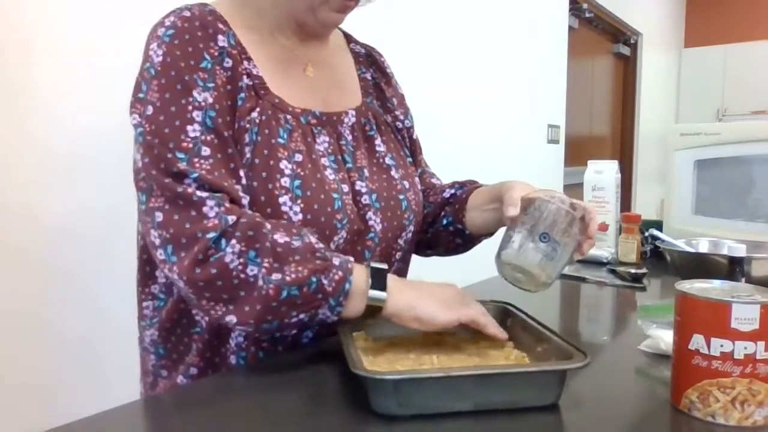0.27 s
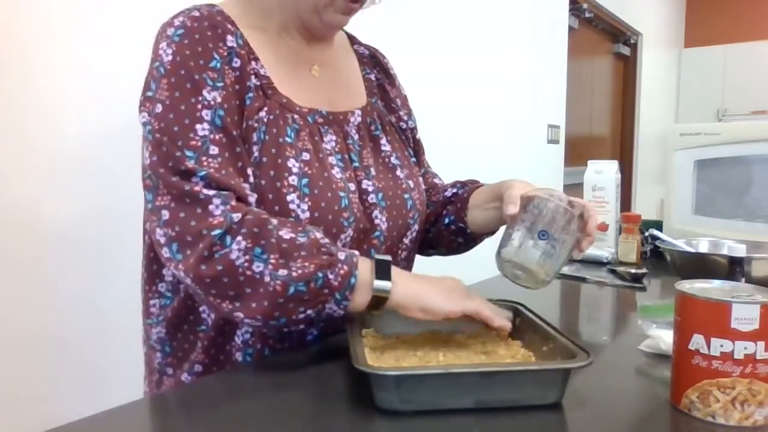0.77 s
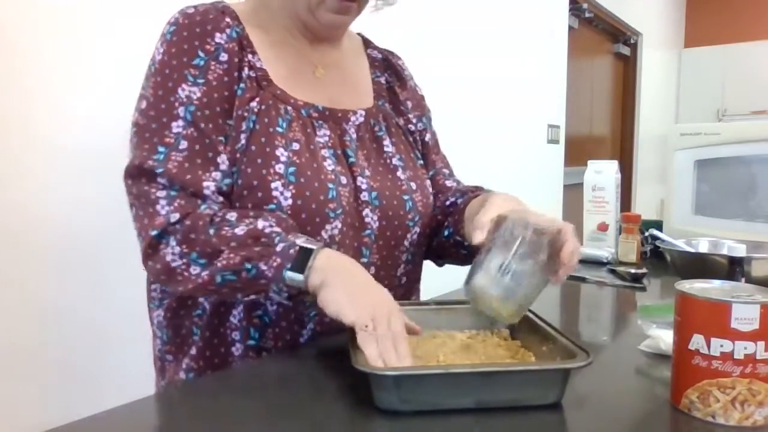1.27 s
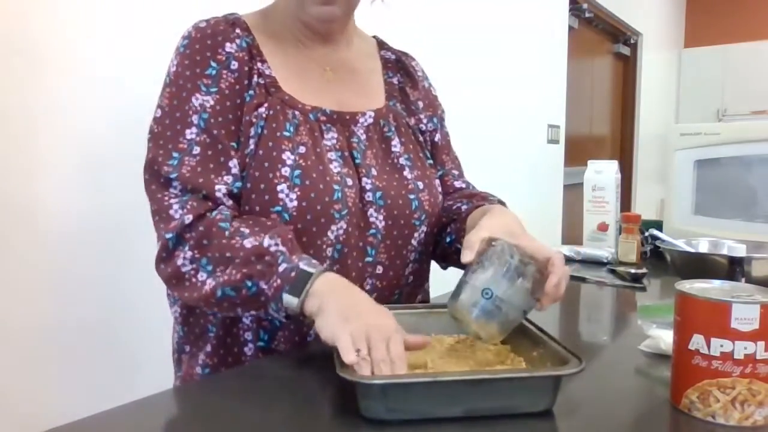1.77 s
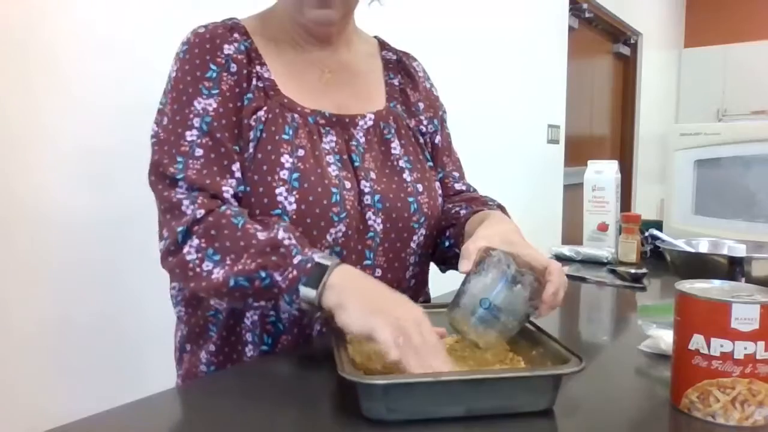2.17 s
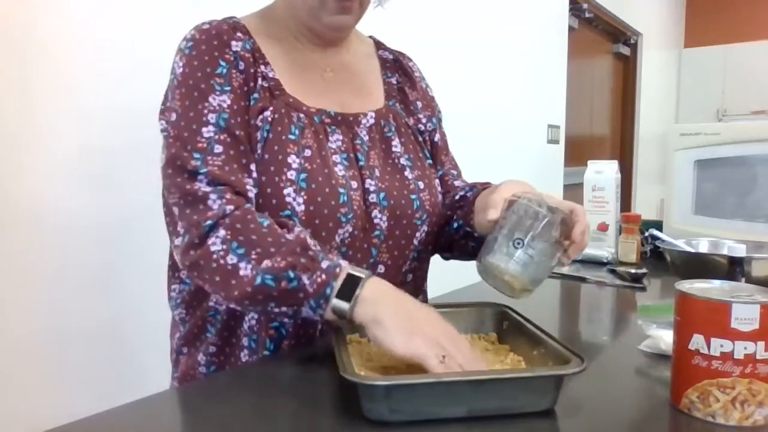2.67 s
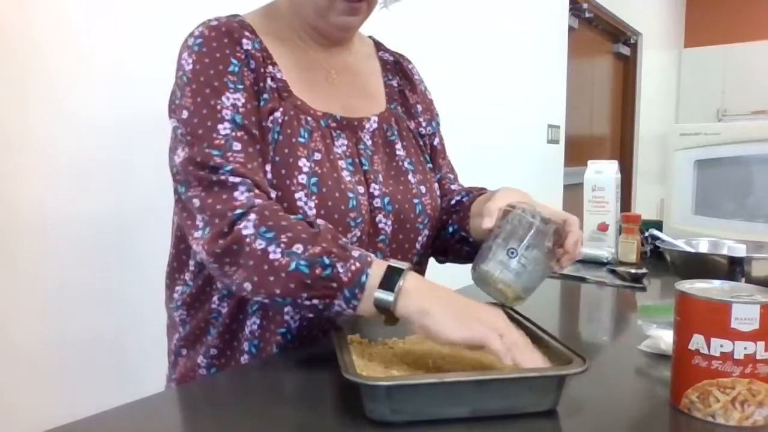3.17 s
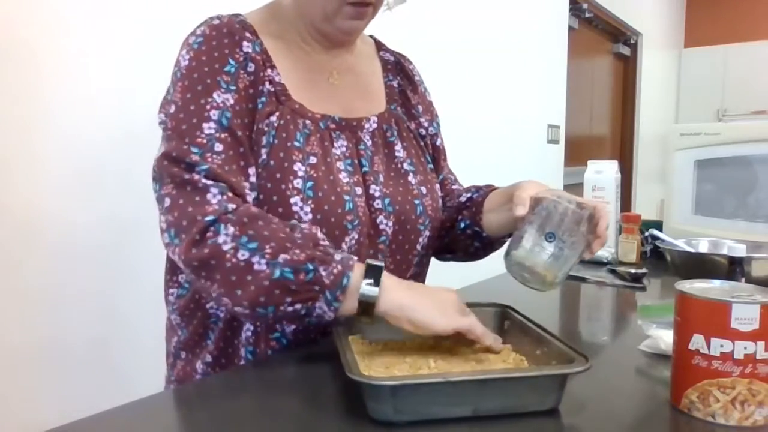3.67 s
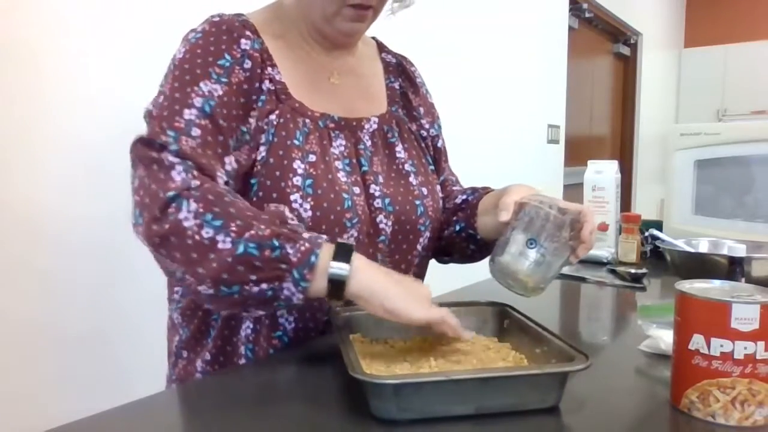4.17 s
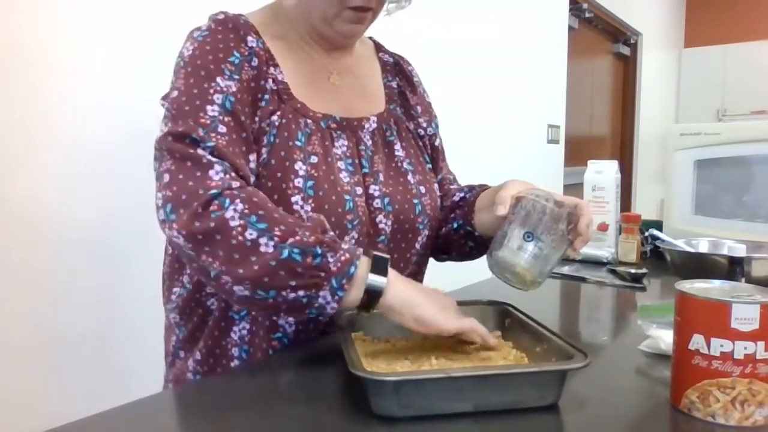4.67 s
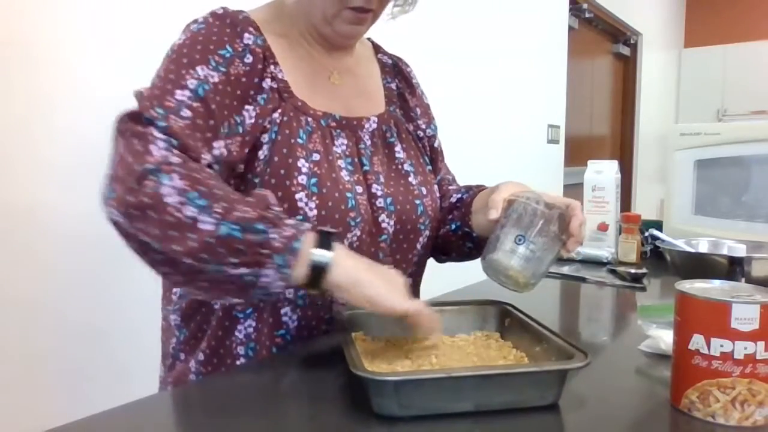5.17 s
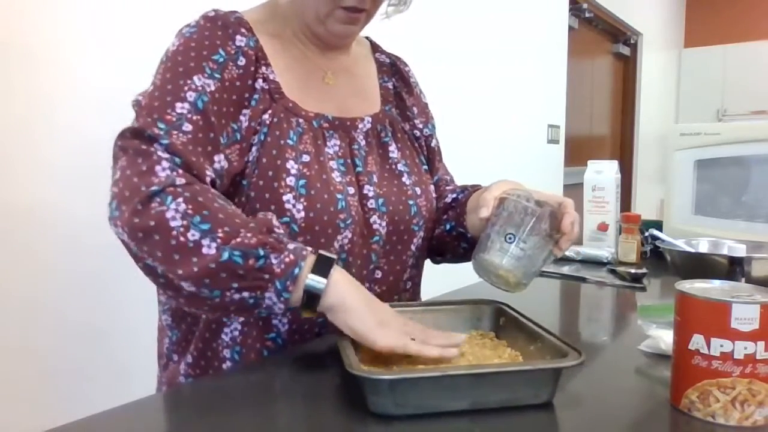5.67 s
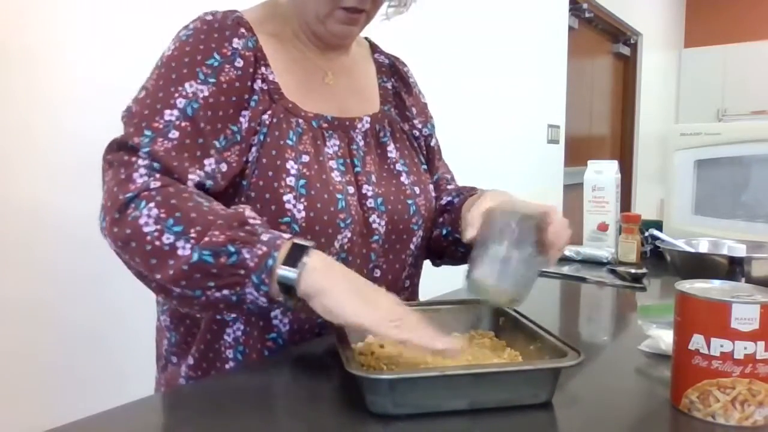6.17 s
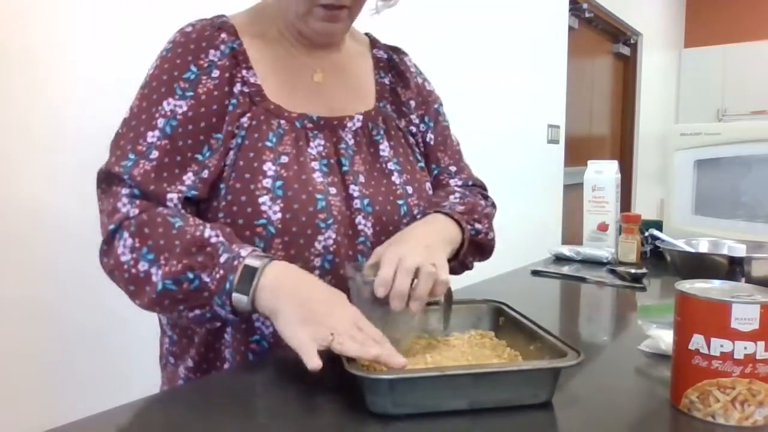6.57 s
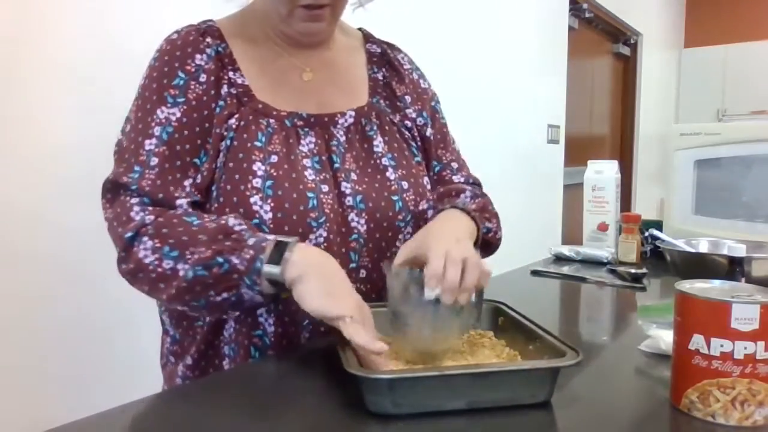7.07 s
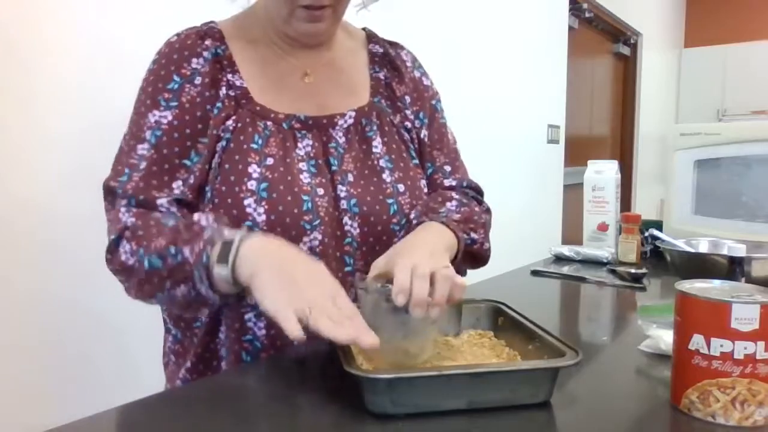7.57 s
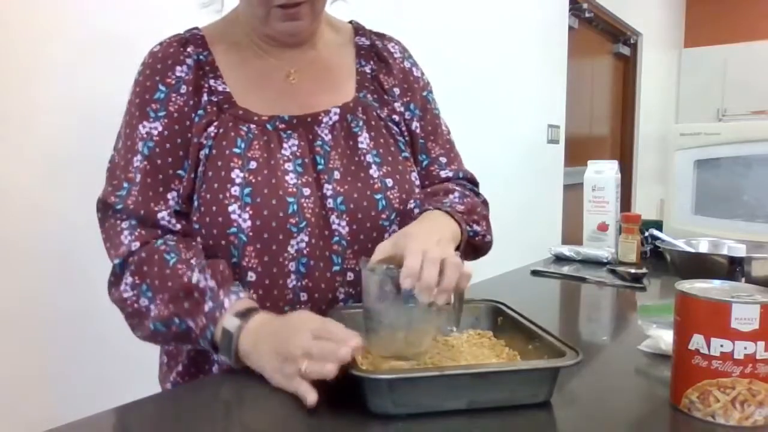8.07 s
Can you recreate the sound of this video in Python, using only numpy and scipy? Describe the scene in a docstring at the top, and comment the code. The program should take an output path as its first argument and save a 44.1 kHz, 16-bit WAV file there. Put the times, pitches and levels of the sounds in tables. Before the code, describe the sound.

Gritty rubbing and soft, hollow pats on a crumb crust, as a glass jar knocks a metal pan over faint room rumble.

```python
"""A kitchen counter, where a hand presses and smooths a crumb crust in a square metal baking pan.
Fingers brush in short, gritty strokes and pat hollow notes out of the crust; crumbs scrape and snap along
the pan's wall. A glass jar in the other hand comes down hard once among lighter knocks, ringing both
pan and glass. Near the end, fingertips tap the pan's side. The room rumbles faintly underneath."""
import sys
import numpy as np
from scipy import signal
from scipy.fft import rfft, irfft
from scipy.io import wavfile
from scipy.ndimage import uniform_filter1d

SR = 44100
rng = np.random.default_rng(int(sys.argv[2]) if len(sys.argv) > 2 else 0)


def to_wav(sig):
    """Store sig (one row per channel, or 1-D mono) as 16-bit WAV at the path in sys.argv[1].

    Samples outside -1..1 are clipped; the rate is SR.
    """
    pcm = np.clip(np.atleast_2d(sig), -1, 1) * 32767
    pcm = np.round(pcm).astype(np.int16)
    wavfile.write(sys.argv[1], SR, pcm.T)  # frames by channels


N = 366603
TIME = np.arange(N) / SR
HIT_TIME = TIME[:SR // 3]
FREQS = np.maximum(np.fft.rfftfreq(N, 1 / SR), 1)

# flat finger pats on the crust: (time [s], note [dB], final pitch [Hz], note t60 [s], crumb hiss [dB])
CRUST_PATS = [ (0.333, -42.5, 543, 0.14, -75), (3.707, -39, 523, 0.078, -49),
              (3.9646, -30, 529, 0.059, -46), (4.290, -40.5, 515, 0.1, -66),
              (4.671, -34.5, 523, 0.097, -37), (4.959, -32.5, 540, .07, -40.5),
              (5.294, -44, 766, 0.083, -66), (5.320, -45, 479, 0.18, -68), (6.54, -35, 509, 0.15, -51)]
# fingertip taps on the pan's side:
# (time [s], thud [dB], thud pitch [Hz], hiss fall [s], crumb hiss [dB], pressure [dB])
SIDE_TAPS = [ (7.174, -50, 1220, 0.011, -55, 8), (7.192, -25.5, 910, .005, -35, -5),
             (7.579, -42, 880, 0.017, -48.5, 1), (7.904, -45, 1080, .02, -45, 1.5),
             (8.278, -26, 960, 0.015, -42, 4.5)]


def from_db(db):
    """Decibels to gain."""
    return 10 ** (np.asarray(db) / 20)


def unit_rms(x):
    """Scale to unit power."""
    return x / np.sqrt(np.mean(x ** 2) + 1e-20)


def curve(points):
    """Draw a curve through (Hz, value) points over log frequency."""
    hz, value = np.transpose(points)
    return np.interp(np.log(FREQS), np.log(hz), value)


def mix_in(out, start, sound):
    """Mix a sound in at its start time, in seconds."""
    slot = out[..., round(start * SR):][..., :sound.shape[-1]]
    slot += sound[..., :slot.shape[-1]]


def wander(depth_db, samples):
    """A gain that drifts at random, smoothed over so many samples."""
    return from_db(depth_db * unit_rms(uniform_filter1d(rng.standard_normal(N), size=samples)))


def swells(rows, roundness):
    """Envelope from rows of (peak [s], rise [s], fall [s], level [dB]); 10 dB down at rise and fall."""
    t, power = TIME[::16], 0
    for peak, rise, fall, level_db in rows:
        away = np.abs(t - peak) / np.where(t < peak, rise, fall)
        power = power + from_db(level_db - 10 * away ** roundness) ** 2
    return np.interp(TIME, t, np.sqrt(power))


def stereo_noise(colour, grit_db=0):
    """Coloured noise with the pan's stereo image; grit makes some grains much larger than the rest."""
    # how alike left and right are: (frequency [Hz], likeness [0-1])
    likeness = [(500, .97), (1200, 0.7), (2500, 0.9), (5000, 0.3), (14000, 1)]
    # stereo balance: (frequency [Hz], left minus right [dB])
    balance = [(550, -0.5), (1650, -1), (5000, -0.5), (9000, -0.5), (13000, -7.5)]
    white = rng.standard_normal((2, N))
    grit = from_db(grit_db * rng.standard_normal(N // 16 + 1).repeat(16)[:N])
    mid, side = rfft(white * grit)
    alike = np.clip(curve(likeness), 0, .999)
    sides = np.array([[1], [-1]])
    pair = np.sqrt(1 + alike) * mid + sides * np.sqrt(1 - alike) * side
    return unit_rms(irfft(pair * colour * from_db(sides * curve(balance) / 2), N))


def room_tone(mid_db=-49.5, side_db=-63, mic_hiss_db=-78.5):
    """The room's low, centred rumble under the microphones' own faint, wide hiss."""
    # spectrum common to both channels: (frequency [Hz], relative level [dB])
    mid_spectrum = [(11, -24), (18, 3), (67, -9), (100, -13), (150, -13.5), (190, -19), (290, -21),
                    (434, -24), (1110, -35), (1800, -37), (2250, -40), (2990, -37.5), (4580, -45),
                    (8000, -52.5)]
    # spectrum of the left-right difference: (frequency [Hz], relative level [dB])
    side_spectrum = [(11, -40.5), (18, 0), (207, -20.5), (253, -20.5), (544, -26), (882, -29),
                     (2250, -26.5), (2830, -20), (7220, -30.5), (9060, -33), (10700, -32.5), (16000, -32.5)]
    mid, side = [unit_rms(irfft(rfft(rng.standard_normal(N)) * from_db(curve(spectrum)), N))
                 for spectrum in (mid_spectrum, side_spectrum)]
    hiss = unit_rms(np.diff(rng.standard_normal((2, N + 2)), n=2))
    room = from_db(mid_db) * mid + from_db(side_db) * side * [[1], [-1]]
    return room * from_db([[-.3], [.3]]) + from_db(mic_hiss_db) * hiss


def touches(stroke_fall_ratio=1.1, tap_lag_s=.0012):
    """Strokes, pats and taps all shift crumbs: (peak [s], rise [s], fall [s], hiss [dB], pressure [dB])."""
    # brushing strokes of the hand: (peak [s], rise [s], hiss [dB], pressure [dB])
    hand_strokes = [ (0.005, 0.057, -59, -3), (0.185, .04, -72, 2), (0.379, 0.046, -49, -1),
                    (0.649, 0.039, -49, -1.5), (0.79, .03, -61.5, -9), (1.47, 0.081, -61, -2),
                    (1.55, 0.05, -50.5, -3), (1.757, 0.11, -59.5, 1), (2.077, 0.032, -52.5, -3),
                    (2.344, .02, -53.5, 0), (2.721, .022, -64, -0.5), (3.002, 0.018, -50, -2),
                    (3.08, 0.051, -63, -5), (3.274, 0.045, -50, 1), (3.732, 0.047, -50, -3.5),
                    (3.945, 0.062, -65, 1.5), (4.304, 0.033, -48.5, 0), (4.364, .033, -46.5, -2.5),
                    (4.463, 0.019, -63, -6), (4.71, .052, -51.5, -3), (5.301, 0.031, -55.5, -5),
                    (5.444, 0.02, -58, -5), (5.675, 0.023, -53.5, -1), (5.715, 0.025, -44.5, -3.5),
                    (5.823, 0.05, -47, -1.5), (6.778, 0.016, -48, -1), (7.153, 0.11, -62.5, -7),
                    (7.374, .029, -53.5, -8.5)]
    strokes = [(peak, rise, rise * stroke_fall_ratio, db, pressure)
               for peak, rise, db, pressure in hand_strokes]
    pats = [(start, .011, .015, db, 3) for start, *_, db in CRUST_PATS]
    taps = [(start + tap_lag_s, .0032, fall, db, pressure) for start, *_, fall, db, pressure in SIDE_TAPS]
    return strokes + pats + taps


def brushing(linger_s=.12):
    """Countless tiny slips under the hand: fine ones hiss, coarse ones rasp, more so under pressure."""
    # spectrum of the fine slips: (frequency [Hz], relative level [dB])
    hiss_spectrum = [(2000, -26.5), (5000, -9), (7500, -9.5), (9000, -3), (11000, -5.5), (13000, -3),
                     (15500, -1), (17000, -2.5)]
    # spectrum of the coarse slips: (frequency [Hz], relative level [dB])
    rub_spectrum = [(150, -15), (400, -1), (650, 9), (1100, 6.5), (2000, 0.5), (4000, -1), (6500, -4),
                    (9000, -10), (16000, -26)]
    hiss = stereo_noise(from_db(curve(hiss_spectrum)), grit_db=3)
    rub = stereo_noise(from_db(curve(rub_spectrum)), grit_db=4)
    fine = swells([row[:-1] for row in touches()], roundness=1.47)
    # in dB, the rub grows about half as fast as the hiss
    coarse = swells([(peak, rise, fall, -26 + .56 * db + pressure)
                     for peak, rise, fall, db, pressure in touches()], roundness=1.62)
    pole = np.exp(-1 / (linger_s * SR))
    lingering = np.sqrt(signal.lfilter([1 - pole], [1, -pole], fine ** 2))
    rustle = 2 * from_db(-23) * lingering
    resting = from_db(-80) * wander(depth_db=5.5, samples=5000)   # the hand never lies quite still
    clumps = unit_rms(wander(depth_db=2, samples=180))   # crumbs give way in clumps
    hiss_envelope = from_db(-1) * np.sqrt(fine ** 2 + rustle ** 2 + resting ** 2)
    return hiss_envelope * hiss + coarse * clumps * rub


def scraping(wall_db=-1.5, snap_db=-5.5, fall_ratio=1.3):
    """Crumbs stick, slip and snap on the pan's wall, which sings at its resonances."""
    # crumbs dragged along the wall: (peak [s], rise [s], level [dB])
    scrapes = [ (0.01, 0.016, -51), (0.214, 0.094, -57), (0.367, 0.046, -57), (0.624, 0.038, -57),
               (1.487, 0.087, -50), (1.681, 0.032, -44.5), (1.777, 0.035, -47.5), (3.247, .032, -51),
               (4.35, 0.021, -49.5), (5.31, 0.055, -60), (6.691, 0.017, -55.5)]
    # resonances of the wall: (frequency [Hz], width [Hz], relative level [dB])
    wall_modes = [(553, 120, -10), (808, 39, 5.5), (1200, 200, -14), (1340, 110, -8), (1845, 150, -9),
                  (2657, 400, -15.5), (3903, 300, -24)]
    wall = sum((-1) ** k * from_db(db) / (1 + 1j * (FREQS - hz ** 2 / FREQS) / width)
               for k, (hz, width, db) in enumerate(wall_modes))
    grip = wander(depth_db=1.7, samples=350)   # the drag is jerky
    drag = swells([(peak, rise, rise * fall_ratio, db) for peak, rise, db in scrapes], roundness=1.4)
    singing = unit_rms(grip * stereo_noise(wall, grit_db=3.5))
    return drag * (from_db(wall_db) * singing + from_db(snap_db) * snapping())


def snapping(per_s=170, spread_db=4, low_hz=804, high_hz=3070, pitches=40, t60_cycles=62, octave_db=-3):
    """Crumbs snap at random, each with a short ping of its own pitch and size."""
    onsets = rng.random(N) < per_s / SR
    snaps = onsets * from_db(spread_db * rng.uniform(-1, 1, N)) * rng.choice([-1, 1], N)
    pitch_index, out = rng.integers(0, pitches, N), 0
    for k, hz in enumerate(np.geomspace(low_hz, high_hz, pitches)):
        decay, angle = from_db(-60 * hz / (t60_cycles * SR)), 2 * np.pi * hz / SR
        resonator = [0, np.sin(angle)], [1, -2 * decay * np.cos(angle), decay ** 2]
        ping = signal.lfilter(*resonator, snaps * (pitch_index == k) + 1e-18)
        out = out + from_db(octave_db * np.log2(hz / low_hz)) * ping
    return unit_rms(out)


def patting(sink_ratio=1.258, sink_s=.015, attack_s=.00053, roughness=.5, flutter_hz=71):
    """The hollow under the fingers sounds a short note that sinks as they settle; the pan rings softly."""
    out, t = np.zeros((2, N)), HIT_TIME
    glide = np.cumsum(1 + (sink_ratio - 1) * np.exp(-t / sink_s)) / SR
    smooth = signal.butter(2, flutter_hz, fs=SR, output="sos")
    for start, note_db, hz, t60, _ in CRUST_PATS:
        # the crumbling crust roughens the note in level and phase
        flutter, wobble = roughness * unit_rms(signal.sosfilt(smooth, rng.standard_normal((2, len(t)))))
        envelope = from_db(note_db - 60 * t / t60) * (1 - np.exp(-t / attack_s))
        note = envelope * (1 + flutter) * np.sin(2 * np.pi * hz * glide + 2 * wobble)
        pan = pan_ring(-25.5 + .53 * note_db, base_t60=.099, octave_db=-2.5, spread_s=.0004)
        mix_in(out, start, note + pan)
    return out


def pan_ring(level_db, base_t60, octave_db, spread_s=.0022):
    """The metal rings once a hit has spread to the walls; octave_db makes the ring brighter or duller."""
    # modes of the pan on the counter: (frequency [Hz], relative level [dB], t60 [multiple of base_t60])
    pan_modes = [ (139.7, -20, 4.5), (170, -19.5, 3.3), (225.2, -15, 2.6), (321.6, -23.5, 3.6),
                 (427, -14.5, 2.2), (536.3, -2.5, 1.65), (643, -11, .9), (687, -2.5, 1.1), (833, -3, 1.2),
                 (922, -3.5, 0.54), (1016, -8, 1.1), (1170, 0.5, 0.66), (1347, -5.5, 0.77),
                 (1465, -1, 0.35), (1410, -21.5, 0.92), (1686, -9, 0.75), (1847, -11, 0.79),
                 (1903, -18, 0.99), (2344, -11.5, .8), (2510, -21, 0.615), (2735, -13.5, 0.36),
                 (3100, -21.5, 0.58), (3490, -27, .7), (3670, -36.5, 0.83), (3676, -22, .8),
                 (4667, -26.5, 0.83)]
    hz, mode_db, sustain = np.transpose(pan_modes)
    tilt_db = octave_db * np.log2(np.maximum(hz, 500) / 700)
    attack = 1 - np.exp(-(HIT_TIME / spread_s) ** 2)
    return attack * ringing(hz, level_db + mode_db + tilt_db, base_t60 * sustain)


def ringing(hz, level_db, t60):
    """Decaying modes; higher ones reach the two microphones further out of phase."""
    hz, level_db, t60, t = hz[:, None], level_db[:, None], t60[:, None], HIT_TIME
    polarity = -(-1) ** np.arange(len(hz))[:, None]
    phase = rng.choice([-1, 1], hz.shape) * np.minimum(hz / 5500, .8) ** .91
    uneven_db = rng.normal(0, 1.2, hz.shape)
    envelopes = polarity * from_db(level_db + uneven_db - 60 * t / t60)
    return np.array([np.sum(envelopes * np.sin(2 * np.pi * hz * t + side * phase), axis=0)
                     for side in (1, -1)])


def knocking(crack_attack_s=.0013, crack_t60=.046):
    """The jar hits the pan: a damped thud, a ring of metal and glass, and a short crack."""
    # jar knocks: (time [s], thud [dB], thud pitch [Hz], thud swell [s], glass ring [dB])
    knocks = [ (1.4205, -49, 1110, .001, -69.5), (1.538, -36.5, 1510, 0.0019, -60),
              (1.6081, -3.0, 850, .00135, -41), (1.6654, -26, 770, 0.00098, -62),
              (1.712, -36, 1300, 0.0015, -62), (1.76, -34, 1404, 0.0045, -65),
              (1.776, -36.5, 880, 0.0027, -46), (1.8235, -41, 875, 0.0015, -72),
              (1.913, -28, 809, 0.0091, -56), (2.060, -41, 1450, .0026, -63),
              (2.1572, -21.5, 600, 0.0019, -42), (2.16, -29.5, 1156, 0.0037, -43)]
    # modes of the jar, damped by the hand: (frequency [Hz], relative level [dB], t60 [s])
    jar_modes = [(2502, 3.5, .075), (2581, -1, 0.1), (4490, -28, .05), (4610, -11, 0.042), (4820, 0, 0.033)]
    # spectrum of the crack: (frequency [Hz], relative level [dB])
    crack_spectrum = [(130, 5), (280, -5), (600, -1), (1200, -8), (2500, 4), (3200, -6.5), (4300, -2.5),
                      (5500, -13), (7500, -22.5), (11000, -27.5), (16000, -29.5)]
    out, crack_envelope, t = np.zeros((2, N)), np.zeros(N), HIT_TIME
    jar_hz, jar_db, jar_t60 = np.transpose(jar_modes)
    burst = from_db(-60 * t / crack_t60) * (1 - np.exp(-t / crack_attack_s))
    for start, thud_db, hz, swell_s, glass_db in knocks:
        # pan ring and crack grow with the thud, though less steeply
        pan = pan_ring(-20.5 + .69 * thud_db, base_t60=.072, octave_db=-2)
        glass = ringing(jar_hz, glass_db + jar_db, jar_t60)
        mix_in(out, start, thud(thud_db, hz, swell_s) + pan + glass)
        mix_in(crack_envelope, start, from_db(-17.5 + .88 * thud_db) * burst)
    crack = crack_envelope * stereo_noise(from_db(curve(crack_spectrum)))
    return out * from_db([[-.2], [.2]]) + crack


def thud(level_db, hz, swell_s):
    """The pan's loaded base swings for a few cycles and is damped by the crust."""
    t = HIT_TIME
    envelope = (t / swell_s * np.exp(1 - t / swell_s)) ** 3
    return -from_db(level_db) * envelope * np.sin(2 * np.pi * hz * t)


def tapping(bounce_s=.0068, bounce_loss_db=5.5):
    """A fingertip on the pan's side gives a small thud and a bright, brief ring, then bounces once."""
    out = np.zeros((2, N))
    for start, thud_db, hz, *_ in SIDE_TAPS:
        for delay, loss_db in ((0, 0), (bounce_s, bounce_loss_db)):
            pan = pan_ring(-35 + .33 * thud_db - loss_db, base_t60=.06, octave_db=4)
            mix_in(out, start + delay, thud(thud_db - loss_db, hz, swell_s=.0022) + pan)
    return out


def kitchen_reverb(x, t60=.76, wet_db=-21, damping_hz=3500, predelay_s=.005):
    """The walls add a faint, dull tail, nearly alike at the two close microphones."""
    t = TIME[:SR // 2]
    echoes = rng.standard_normal(len(t)) + .36 * rng.standard_normal((2, len(t)))
    echoes *= from_db(-60 * t / t60) * (t > predelay_s)
    tail = signal.sosfilt(signal.butter(2, damping_hz, fs=SR, output="sos"), echoes)
    tail /= np.sqrt(np.sum(tail ** 2) / 2 * SR / (2 * damping_hz))   # about unit gain in the passband
    return x + from_db(wet_db) * signal.fftconvolve(x, tail, axes=1)[:, :N]


def scene():
    """Hand, jar and pan over a bed of quiet room tone."""
    foley = brushing() + scraping() + patting() + tapping() + knocking()
    return kitchen_reverb(foley) + room_tone()


def record(dry):
    """A steep low-pass trims the very top."""
    return signal.sosfilt(signal.ellip(12, .1, 70, 15750, fs=SR, output="sos"), dry)


dry = scene()
out = record(dry)
to_wav(out)
```